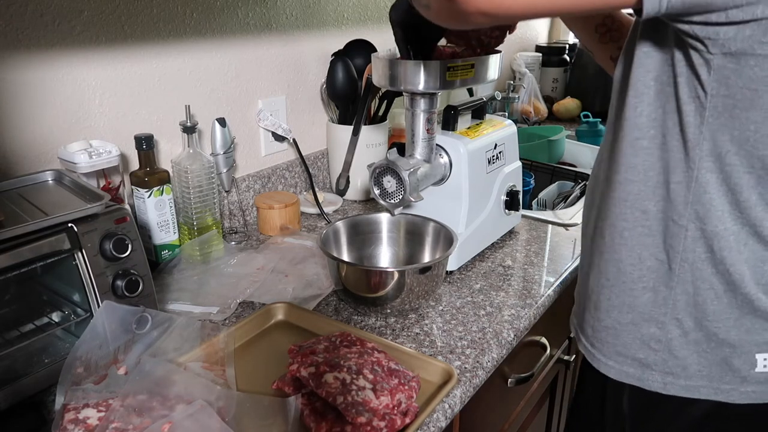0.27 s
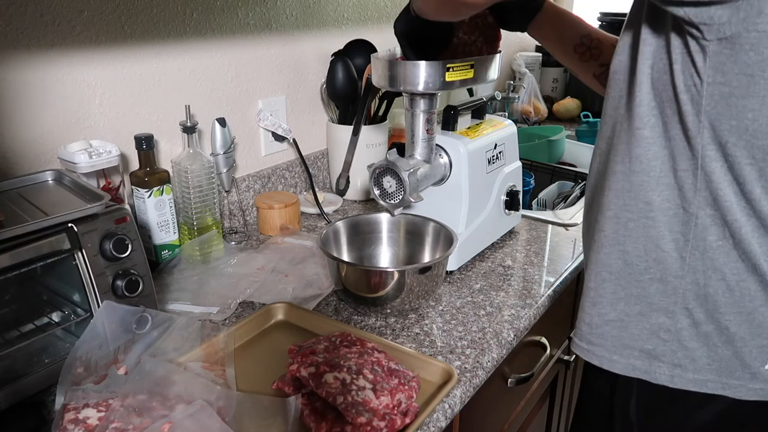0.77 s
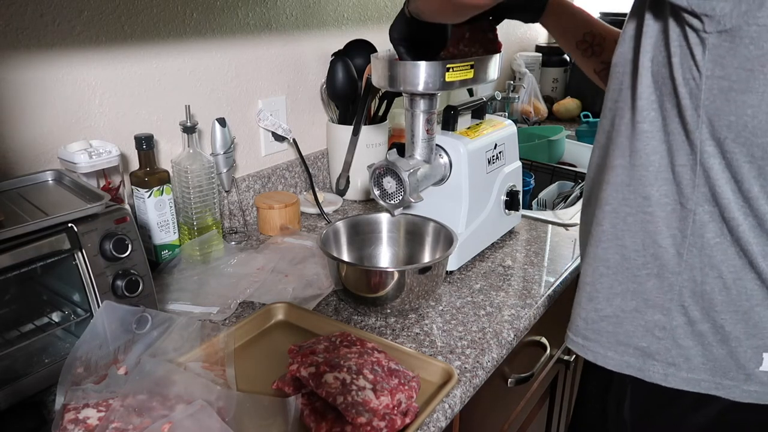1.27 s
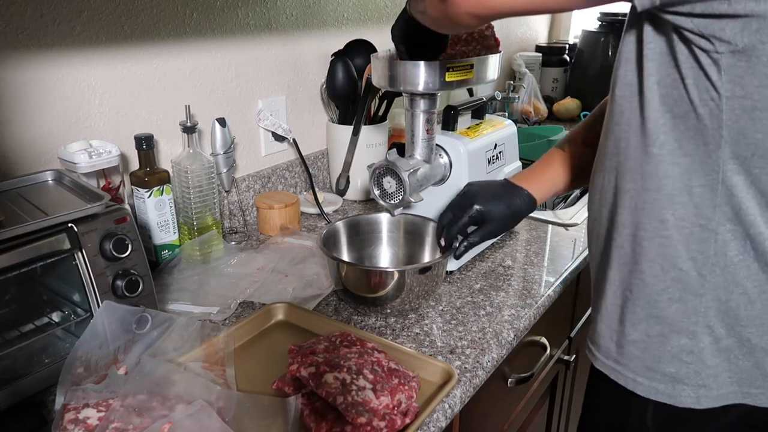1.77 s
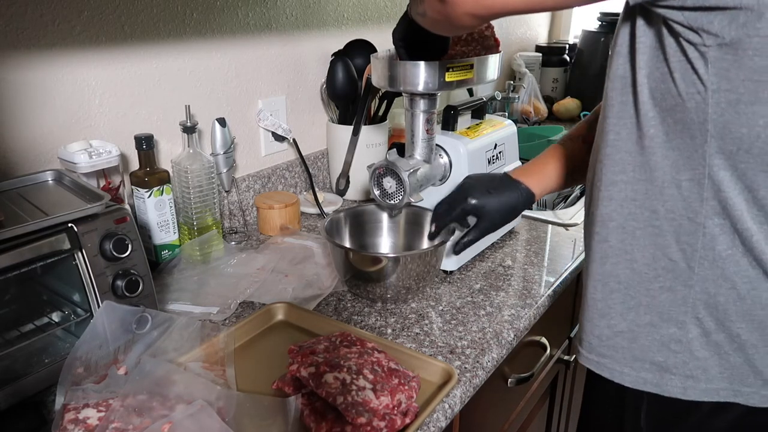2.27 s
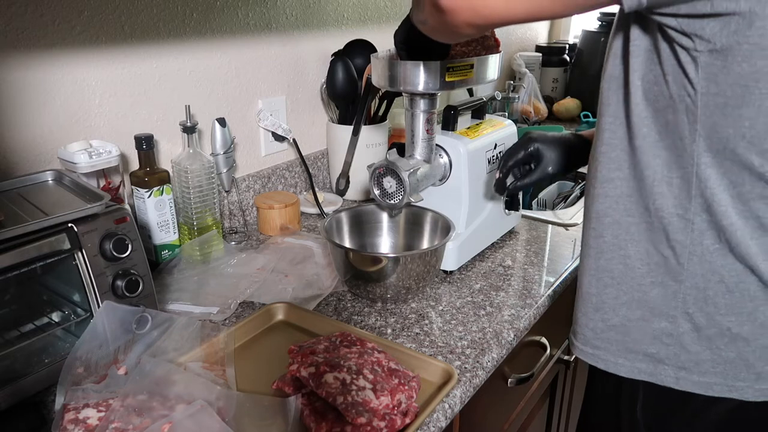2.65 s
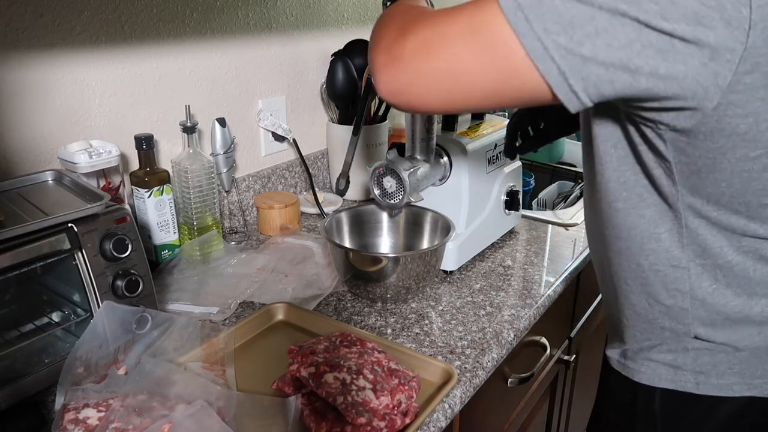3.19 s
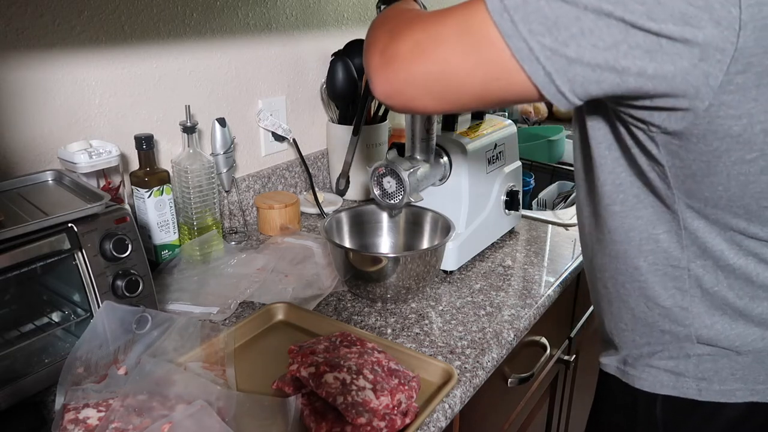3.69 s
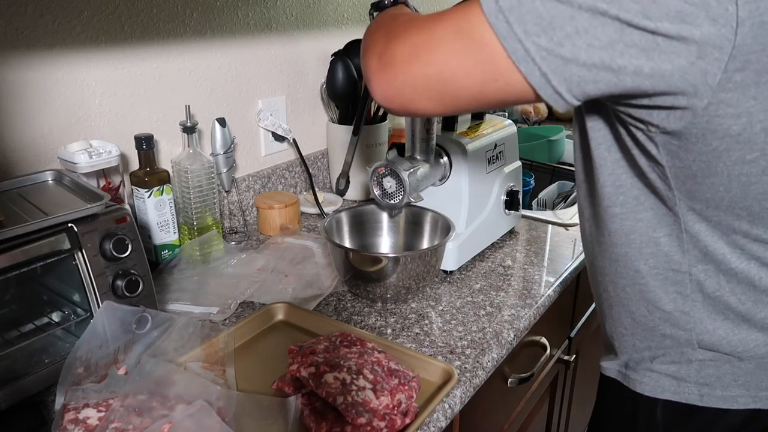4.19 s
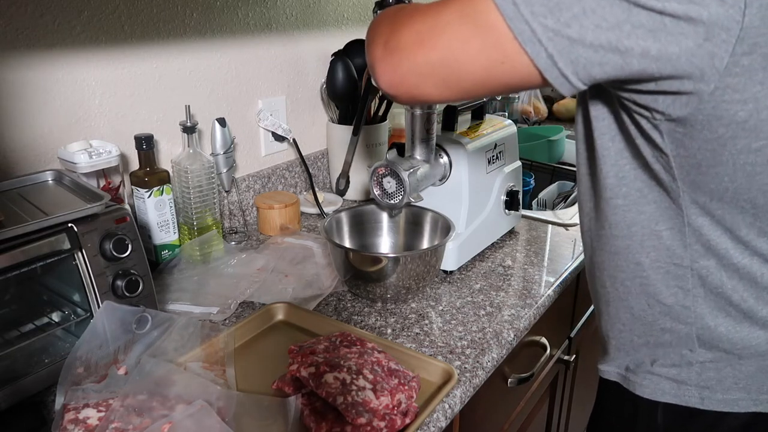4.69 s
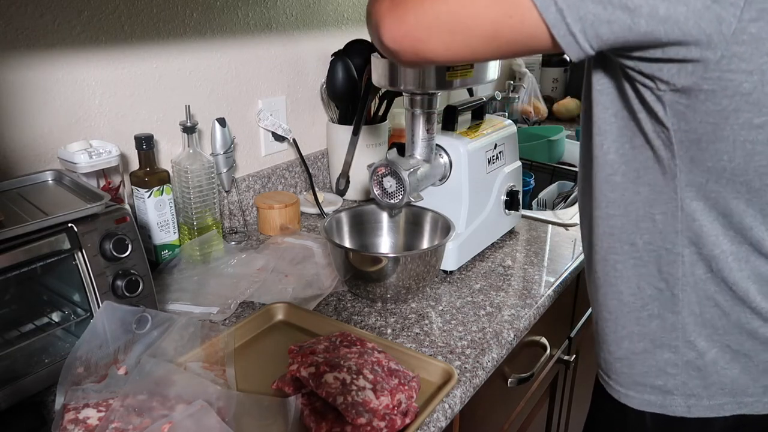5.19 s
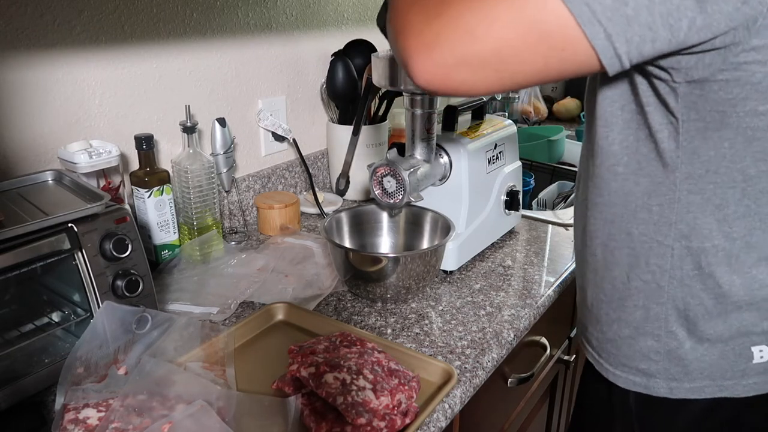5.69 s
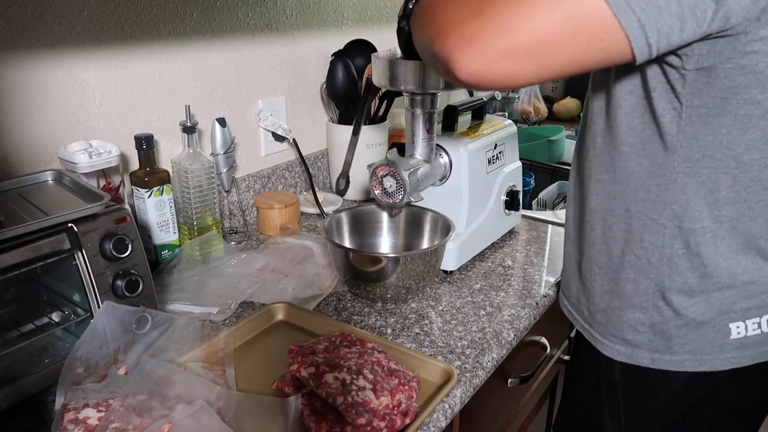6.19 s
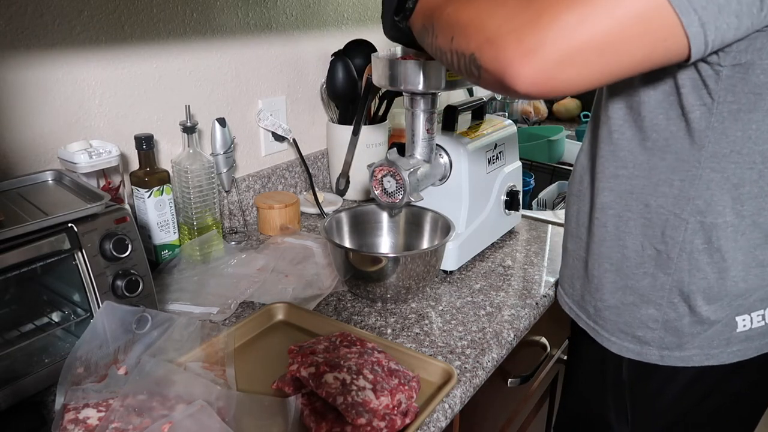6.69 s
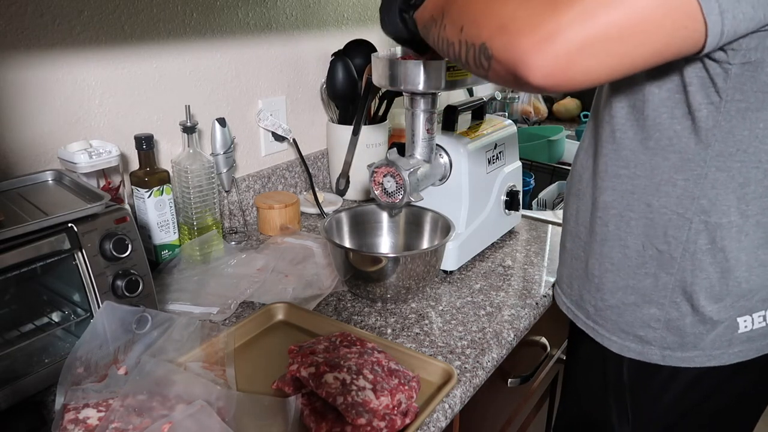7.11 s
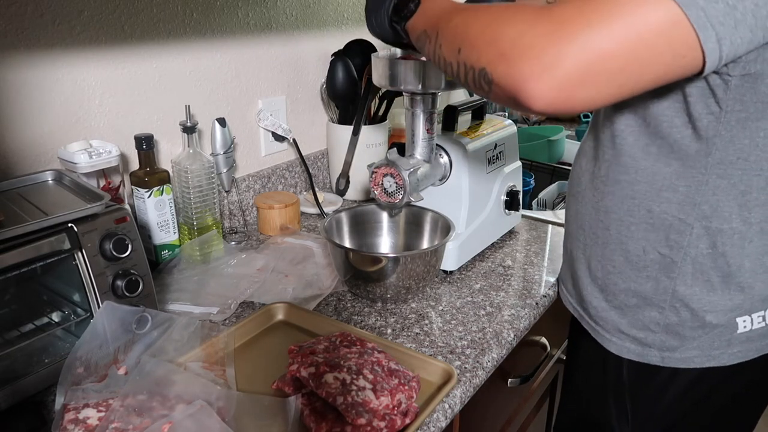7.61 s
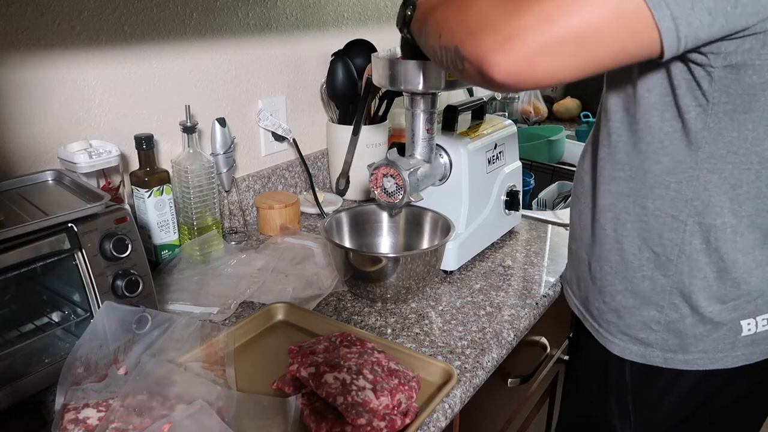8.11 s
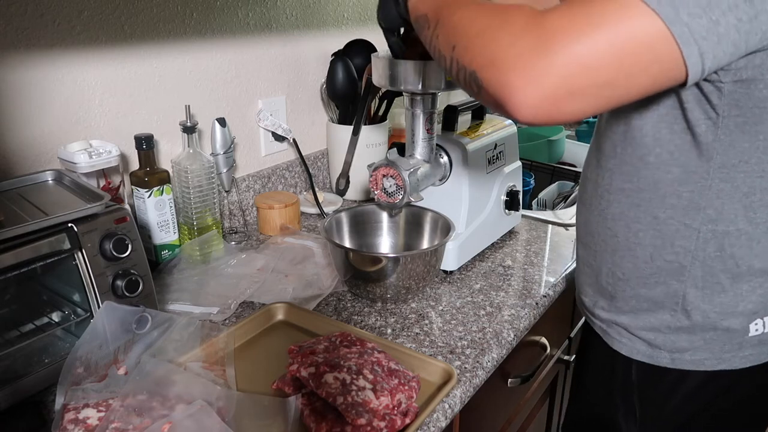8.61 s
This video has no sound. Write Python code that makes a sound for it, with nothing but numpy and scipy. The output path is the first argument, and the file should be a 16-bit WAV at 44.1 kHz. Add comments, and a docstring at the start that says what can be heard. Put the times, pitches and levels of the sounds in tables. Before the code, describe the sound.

A small electric meat grinder runs throughout on a kitchen counter: low motor hum, high unsteady gear whine and dense harsh rattle. About two seconds in, a steel bowl is knocked once with a quick clack and thud. As meat loads the machine, the pitch sags slightly, the rattle softens and the whine sings more clearly. Close, dry stereo pickup with the noise spread wide at the top.

```python
"""A high whine, a hum and a harsh rattle sound from the start: an electric meat grinder on a kitchen counter.
The motor hums once a turn, its pinion whines at the tooth rate against the first gear, later gears drone,
and loose gears rattle as noise that partly repeats with each gear turn, coloured by the housing.
Half-frozen meat loads the auger: speed sags, the teeth stay in contact, and rattle gives way to whine.
A hand knocks the bowl once; it clacks, thuds and settles in a quick run of blows."""
import sys
import numpy as np
from scipy import signal
from scipy.fft import rfft, irfft
from scipy.io import wavfile

SR = 44100
rng = np.random.default_rng(int(sys.argv[2]) if len(sys.argv) > 2 else 0)


def master(y):
    """Save y as 16-bit WAV."""
    cut = np.clip(np.atleast_2d(y).T, -1, 1)
    pcm = np.round(cut * 32767)  # scale
    wavfile.write(sys.argv[1], SR, pcm.astype(np.int16))


N = 390285
T = np.arange(N) / SR
HZ = np.fft.rfftfreq(N, 1 / SR)

# mean motor speed, sagging as the meat is pushed in: (time [s], speed [turns/s])
MEAN_SPEED = [(0.0, 266.1), (0.16, 264.1), (0.67, 267.2), (0.84, 266.5), (1.17, 261.3), (2.24, 261.5),
              (2.5, 259.4), (2.68, 255.6), (3.29, 257.4), (3.51, 253.8), (3.9, 252.4), (4.65, 253.2),
              (5.17, 249.2), (5.5, 251.6), (5.74, 243.8), (6.45, 238.4), (7.28, 243.6), (7.58, 243.1),
              (8.85, 249.3)]
# stereo width over frequency: (frequency [Hz], side relative to middle [dB])
STEREO_WIDTH = [(60, -32), (200, -44), (400, -17.5), (650, -30), (1300, -29), (2300, -26.5), (2800, -27.5),
                (3400, -5.5), (4500, -5), (6500, -2), (9000, 5), (14000, 5.5)]
PINION_TEETH, GEAR_TEETH = 7, 47
# the teeth are pressed tight at the first motor speed and run loose at the second [turns/s]
TIGHT_HZ, LOOSE_HZ = 240, 266


def gain_of(db):
    """Level to amplitude: 20 dB is a factor of ten."""
    return 10 ** (np.asarray(db) / 20)


def evened(x):
    """Normalisation to unit rms, so that a following gain sets the level."""
    return x / np.sqrt(np.mean(abs(x) ** 2) + 1e-20)


def curve(rows):
    """Linear interpolation of a control curve to every sample."""
    return np.interp(T, *np.transpose(rows))


def read(points, hz):
    """Linear interpolation of a spectrum on a logarithmic frequency axis."""
    f, value = np.transpose(points)
    return np.interp(np.log(hz + 1), np.log(f + 1), value)


def bump(middle, length):
    """A flat-topped exponential pulse: it rises to 1, holds and falls, with 1/e at both ends of length."""
    shape = np.zeros(N)
    near = slice(*np.searchsorted(T, [middle - length, middle + length]))
    shape[near] = np.exp(-(2 * (T[near] - middle) / length) ** 4)
    return shape


def wander(hz):
    """Low-passed random fluctuation of rms 1, with changes up to about hz."""
    size = 4096
    f = np.fft.rfftfreq(size, T[-1] / size)
    slow = irfft(rfft(rng.standard_normal(size)) / (1 + (f / hz) ** 2))
    return np.interp(T, np.linspace(0, T[-1], size), evened(slow))


def tooth_pattern(turns, count):
    """Periodicity of gear flaws: a random pattern of count harmonics recurs with every turn."""
    size = 16384
    flaws = irfft(np.r_[0, np.exp(2j * np.pi * rng.random(count))], size)
    return np.interp(turns % 1, np.arange(size) / size, evened(flaws))


def tone(turns, flutter, flutter_hz):
    """Random modulation of a rotating phasor, in strength and phase; its real part has rms near 1."""
    unsteady = 1 + flutter * (wander(flutter_hz) + 1j * wander(flutter_hz))
    return np.sqrt(2) * evened(unsteady) * np.exp(2j * np.pi * (turns + rng.random()))


def stereo(mid, side):
    """Sum and difference: middle and side become left and right."""
    return np.array([mid + side, mid - side])


def spread_tone(turns, flutter, flutter_hz):
    """Quadrature stereo: a side part a quarter cycle off, sized by the width at the mean frequency."""
    mean_hz = turns[-1] / T[-1]
    rotating = tone(turns, flutter, flutter_hz)
    side_gain = rng.choice([-1, 1]) * gain_of(read(STEREO_WIDTH, mean_hz))
    return stereo(rotating.real, rotating.imag * side_gain)


def looseness():
    """Tooth contact under load: 0 when speed sags to the tight value, 1 when the teeth run loose."""
    return np.interp(curve(MEAN_SPEED), [TIGHT_HZ, LOOSE_HZ], [0, 1])


def regularity():
    """Periodic against random gear noise: the share that repeats each turn depends on mean speed."""
    # repeating share, largest at middle speeds: (motor speed [turns/s], share [0-1])
    repeating_share = [(240, 0.28), (254, 0.4), (266, 0.26)]
    return np.clip(np.interp(curve(MEAN_SPEED), *np.transpose(repeating_share)), 0, 1)


def auger_turns():
    """Gear reduction: the auger's turns are the integral of mean motor speed over the ratio."""
    motor_turns_per_auger_turn = 82.03
    return np.cumsum(curve(MEAN_SPEED)) / SR / motor_turns_per_auger_turn


def speed():
    """Cyclic load: the auger meets the meat once a turn and motor speed [turns/s] swings about its sag."""
    swing_hz, fastest_at = 1.35, .037  # swing either way with loose gears; place in the auger turn [0-1]
    swing = swing_hz * (1 + looseness()) / 2  # narrower under load
    return curve(MEAN_SPEED) + swing * np.cos(2 * np.pi * (auger_turns() - fastest_at))


def swell_db(name):
    """Cyclic modulation: a sound's level rises and falls with each auger turn."""
    # swell once an auger turn, by sound: (depth either way [dB], place of the peak in the turn [0-1])
    swells = {"hum": (0.35, 0.38), "teeth": (0.73, 0.59), "whine": (0.26, 0.044), "lower": (2.1, 0.85),
              "rattle": (0.45, 0.2)}
    depth_db, peak_at = swells[name]
    return depth_db * np.cos(2 * np.pi * (auger_turns() - peak_at))


def response(name):
    """Structural resonance: the housing favours each tone at certain speeds; returns amplitude."""
    # the motor speeds of the response levels: (speed [turns/s])
    response_speeds = (238.5, 243, 248.5, 251, 253, 257, 261.5, 264.5, 267)
    # level of each tone, one column per speed above: (level [dB], ...)
    # hum, its third harmonic, tooth tone, the whine at its octave, the whine's lower and upper sidebands
    response_levels = {"hum": (-32.5, -36.5, -38.5, -40.5, -42.5, -38.5, -36, -39.5, -41),
                       "third": (-56.5, -52.5, -48, -48.5, -53, -58, -61, -58, -45),
                       "teeth": (-45.5, -40.5, -46, -43.5, -45, -53, -55, -52, -51),
                       "whine": (-33.5, -34, -37, -32.5, -34.5, -41, -43, -42.5, -43),
                       "lower": (-62, -56.5, -49.5, -43.5, -40.5, -48, -43, -42.5, -57),
                       "upper": (-50, -50.5, -59, -57, -56, -59, -61, -47, -48)}
    return gain_of(np.interp(speed(), response_speeds, response_levels[name]))


def strength_of(name):
    """Resonant response times cyclic swell: a tone's amplitude."""
    return response(name) * gain_of(swell_db(name))


def flared(strength, which):
    """Power summation: brief flares, as the teeth bite and sing out, add to a tone's mean square."""
    # flares: (middle [s], length [s], tone, level [dB])
    flare_events = [(0.07, 0.13, "teeth", -38), (0.303, 0.31, "lower", -47), (0.08, 0.15, "whine", -35),
                    (0.405, 0.16, "teeth", -36), (0.412, 0.092, "whine", -36.5),
                    (0.69, 0.08, "teeth", -34.5), (0.815, 0.19, "whine", -39.5), (.85, 0.19, "lower", -38),
                    (1.007, 0.048, "whine", -38), (1.186, .08, "lower", -48),
                    (1.282, 0.041, "whine", -30.5), (1.5, 0.09, "lower", -38), (1.85, .12, "lower", -48),
                    (1.9, 0.064, "whine", -41), (2.12, 0.11, "lower", -39.5), (2.43, 0.084, "lower", -34.5),
                    (2.584, 0.15, "whine", -36.5), (2.78, 0.057, "lower", -31),
                    (3.004, 0.034, "whine", -35), (3.196, 0.1, "whine", -35), (3.2, .12, "lower", -40),
                    (3.516, 0.022, "whine", -22), (3.605, 0.27, "teeth", -44), (3.62, 0.043, "lower", -37),
                    (3.844, 0.021, "whine", -30.5), (3.954, 0.063, "whine", -34),
                    (4.17, 0.057, "whine", -30.5), (4.29, 0.11, "teeth", -38), (4.33, 0.045, "whine", -36),
                    (4.607, 0.046, "teeth", -41), (4.947, 0.088, "teeth", -36.5),
                    (5.013, 0.075, "whine", -30.5), (5.3, 0.11, "teeth", -39), (5.76, 0.17, "whine", -33),
                    (6.5, 0.095, "whine", -33), (6.643, 0.081, "teeth", -34.5),
                    (6.723, 0.065, "whine", -33.5), (6.98, 0.14, "teeth", -35), (7.146, 0.03, "whine", -29),
                    (7.274, 0.1, "teeth", -34.5), (7.45, 0.065, "whine", -29), (7.622, 0.081, "teeth", -37),
                    (7.744, 0.12, "whine", -27), (7.875, 0.1, "whine", -29.5), (8.005, 0.075, "whine", -29),
                    (8.25, 0.72, "whine", -36), (8.51, .08, "teeth", -41), (8.612, 0.044, "whine", -31),
                    (8.795, 0.39, "teeth", -42.5), (8.802, 0.088, "whine", -41)]
    power = sum(gain_of(db) ** 2 * bump(s, length) for s, length, name, db in flare_events if name == which)
    return np.sqrt(strength ** 2 + power)


def contact():
    """Loss of contact: the gain is near 1 while teeth press together and dips as they slip."""
    # slips: (middle [s], length [s], dip [dB])
    slip_events = [(0.253, 0.11, -16), (0.543, 0.19, -2.5), (1.117, 0.085, -13), (1.53, 0.25, 0),
                   (1.753, .07, -14), (2.212, 0.1, -13), (2.456, 0.14, -11), (3.392, 0.23, -28),
                   (3.595, 0.055, -15), (4.265, 0.06, -11), (4.463, 0.13, -5.5), (5.198, 0.2, -6.5),
                   (5.292, 0.074, -13), (5.932, 0.068, -7), (6.077, 0.09, -12), (6.218, 0.031, -11),
                   (8.066, 0.033, -7), (8.467, 0.089, -10)]
    return gain_of(sum(db * bump(s, length) for s, length, db in slip_events))


def housing_db(hz):
    """Superposed resonances: housing and counter favour or weaken a frequency, in dB."""
    # peaks and dips: (centre [Hz], width at half the dB [Hz], height [dB])
    housing_peaks = [(59.6, 14, 9), (111, 45, 9.5), (209.5, 46.6, 14.5), (301.6, 15.6, 7), (419, 45, 2.3),
                     (647.6, 121, 10), (793, 99, 7.5), (938, 68, 4), (1016, 43, -7.5), (1310, 73, 2.5),
                     (1935, 39, 7.5), (2228, 65, 2.5), (2571, 73, 8), (2740, 120, 5.5), (2865, 77, 6),
                     (3116, 55, 4), (3326, 99, 4.5), (3910, 49, -4), (4310, 41, 4), (4750, 130, 0.5),
                     (4810, 99, 7), (5360, 100, -10.5), (5310, 40, 9.5), (5400, 60, 6), (5500, 90, -3),
                     (6050, 120, -3), (6320, 130, -5.5)]
    return sum(db / (1 + (2 * (hz - peak) / width) ** 4) for peak, width, db in housing_peaks)


def bowl(clack_t60=0.083, rise=0.0041):
    """Impact excitation: each blow is a sharp crack, a short steel clatter and decaying counter modes."""
    # blows of the knock and the settling: (time [s], clack level [dB], thud level [dB])
    knock_blows = [(2.165, -27, -48), (2.172, -42, -34), (2.182, -34, -52), (2.194, -45, -38),
                   (2.204, -38, -57)]
    # modes of bowl and counter: (frequency [Hz], level [dB], 60 dB decay time [s])
    thud_modes = [(88, -8, .14), (138, -2, 0.16), (168, 6.5, 0.13), (206, 7.5, 0.29), (320, -6, 0.12),
                  (526, -9, 0.25)]
    # relative spectrum of the clack: (frequency [Hz], density [dB per Hz])
    clack_colour = [(40, -34), (150, -6), (520, 1.5), (720, -2), (950, -5), (1150, 2), (1280, -1.5),
                    (1410, 5), (1580, -7), (1780, -3), (2200, -8), (4000, -25), (9000, -33), (14500, -55)]
    crack_db = 10  # peak of the crack above the rms of the undecayed clatter
    t = T[:SR // 2]
    colour = gain_of(read(clack_colour, np.fft.rfftfreq(len(t), 1 / SR)))
    # minimum phase puts the crack's energy at its very start
    log_gain = np.log(gain_of(read(clack_colour, abs(np.fft.fftfreq(len(t), 1 / SR)))))
    crack = np.fft.ifft(np.exp(signal.hilbert(log_gain).conj())).real
    crack = crack / abs(crack).max()
    thud = sum(gain_of(db - 60 * t / t60) * np.sin(2 * np.pi * hz * t) for hz, db, t60 in thud_modes)
    thud = thud * (1 - np.exp(-t / rise))
    # the thud carries little below about 85 Hz
    thud = signal.sosfilt(signal.butter(2, 85, "highpass", fs=SR, output="sos"), thud)
    fade = np.minimum(t / 0.00065, 1) * gain_of(-60 * t / clack_t60)
    out = np.zeros(N)
    for s, clack_db, thud_db in knock_blows:
        clatter = evened(irfft(rfft(rng.standard_normal(len(t))) * colour, len(t))) * fade
        clack = gain_of(crack_db) * crack + clatter
        out[round(s * SR):][:len(t)] += gain_of(clack_db) * clack + gain_of(thud_db) * thud
    return out


def chatter(gear_turns, repeat, throb):
    """Periodic plus random excitation: some tooth blows repeat each gear turn, and all throb with it."""
    repeat = np.clip(repeat, 0, 1)
    repeating = np.sqrt(repeat) * tooth_pattern(gear_turns, count=440)
    chance = np.sqrt(1 - repeat) * rng.standard_normal(N)
    return evened((repeating + chance) * (1 + throb * tooth_pattern(gear_turns, count=10)))


def rattle(gear_turns):
    """Source and filter: tooth blows within the gears' play excite the housing, band by band."""
    # mean rattle in the middle range, before band trims: (time [s], level [dB])
    rattle_level = [(0, -36.5), (1.9, -36), (2.4, -38), (3.3, -36), (4.1, -38.5), (5.45, -38),
                    (5.85, -39.5), (6.4, -39.5), (6.85, -42), (7.9, -42.5), (8.84, -37)]
    # relative broad spectrum of the running machine: (frequency [Hz], density [dB per Hz])
    machine_colour = [(30, -28.5), (80, -23.5), (170, -16), (280, -8), (1050, -4.5), (1700, 0.5),
                      (2700, -1.5), (3400, 2), (4000, -0.5), (4600, -9.5), (6000, -12.5), (8300, -23.5),
                      (11500, -31.5), (13400, -35.5), (14400, -62)]
    # short fits of loose-gear clatter: (middle [s], length [s], rise in the rasp band [dB])
    clatter_fits = [(0.35, 0.064, 0.5), (0.696, 0.065, 2), (1.918, 0.079, 1), (2.526, 0.046, 1),
                    (3.425, 0.14, 0.5), (4.646, 0.062, 1), (4.9, 0.11, 1.5)]
    loose_uneven_db = 1.35  # rms unevenness with the gears loose, half of it under load
    colour = gain_of(read(machine_colour, HZ) + housing_db(HZ))
    # the level refers to the rasping middle range
    colour = colour / np.sqrt(np.mean(colour ** 2 * ((HZ > 1900) & (HZ < 3200))))
    mean_db = curve(rattle_level)
    surge_db = swell_db("rattle") * looseness() ** 2
    fits_db = sum(db * bump(s, length) for s, length, db in clatter_fits)
    under = [1 / (1 + (HZ / edge_hz) ** 8) for edge_hz in (1400, 4300, 8000)]
    # rumble, rasp, hiss and fizz: (band, level [dB], share of the regularity, throb)
    layers = [(under[0], mean_db + 0.26 * surge_db + .1, .6, .1),
              (under[1] - under[0], mean_db + 2.0 * surge_db + fits_db - .7, .85, .14),
              (under[2] - under[1], mean_db + 1.0 * surge_db + 0.63 * fits_db + 0.22, .25, .06),
              (1 - under[2], mean_db + .15 * surge_db + 0.16, .1, .06)]
    out = np.zeros((2, N))
    for band, db, share, throb in layers:
        mid, side = (rfft(chatter(gear_turns, share * regularity(), throb)) * colour * band for _ in range(2))
        uneven_db = loose_uneven_db * (1 + looseness()) / 2 * wander(hz=23.0)
        both = stereo(mid, side * gain_of(read(STEREO_WIDTH, HZ)))
        out += gain_of(db + uneven_db) * irfft(both, N)
    return out


def later_gears(gear_turns, streak_db=2.0):
    """Order tracking: multiples of the first gear's speed drone and swell across the housing's peaks."""
    # tones, before the housing's gain:
    # (multiple of gear speed [1], level under light load [dB], level under heavy load [dB])
    gear_tones = [(12.05, -65, -60.5), (17, -67.5, -65), (18.15, -71, -66), (19.04, -63.5, -61),
                  (23.03, -74, -65), (23.94, -58, -71), (25, -63, -73), (33.83, -57, -56), (35.8, -71, -68),
                  (46.6, -60, -49), (48.7, -69.5, -54), (50.6, -57.5, -51), (61.1, -51, -62),
                  (62.6, -65, -56), (68.8, -63.5, -54.5), (68.9, -56, -65), (72.2, -56, -64),
                  (74.7, -55, -60), (75, -54, -59), (77.6, -59, -64), (82, -59, -70), (82.1, -56, -50.5),
                  (84.2, -69, -46), (88.5, -53.5, -52), (92, -69, -53), (94.6, -66, -45.5), (117, -60, -58)]
    gear_hz = np.gradient(gear_turns) * SR
    speeds = np.linspace(gear_hz.min(), gear_hz.max(), 200)
    motor_speeds = speeds * GEAR_TEETH / PINION_TEETH
    load = np.interp(motor_speeds, [TIGHT_HZ, (TIGHT_HZ + LOOSE_HZ) / 2], [1, 0])
    drone = 0
    for k, light_db, heavy_db in gear_tones:
        level = (1 - load) * gain_of(light_db) + load * gain_of(heavy_db)
        strength = np.interp(gear_hz, speeds, level * gain_of(housing_db(k * speeds)))
        streaks = evened(gain_of(streak_db * wander(hz=11)))  # each tone comes and goes on its own
        drone = drone + strength * streaks * spread_tone(k * gear_turns, flutter=0.68, flutter_hz=9.9)
    return evened(regularity()) * drone


def motor(turns, side_db=-37, second_db=-55):
    """Rotating unbalance: a hum once a turn with harmonics; fan and commutator add faint tones."""
    # faint tones: (multiple of motor speed [1], level [dB])
    motor_tones = [(16, -86), (17, -57.5), (24, -67)]
    hum = strength_of("hum") * tone(turns, flutter=0.086, flutter_hz=8.4)
    # the second harmonic grows as the gears run loose
    second = gain_of(second_db) * looseness() ** 2 * tone(2 * turns, flutter=1.0, flutter_hz=10).real
    third = response("third") * tone(3 * turns, flutter=0.37, flutter_hz=4.9).real
    faint = sum(gain_of(db) * tone(k * turns, flutter=.6, flutter_hz=4).real for k, db in motor_tones)
    return stereo(hum.real, gain_of(side_db) * hum.imag) + second + third + faint


def whine(turns, gear_turns, gear_throb=0.053, swirl=0.23):
    """Gear meshing: pinion teeth sing at the tooth rate and its octave; flaws and runout modulate them."""
    # lean of the whine to one side as room reflections shift with its pitch: (time [s], left over right [dB])
    side_lean = [(0, 1), (.95, -3), (1.15, 1), (1.35, -1.5), (1.7, 1), (2.35, -1.5), (3.6, -1.5),
                 (3.8, 1.5), (3.95, -2.5), (4.7, -1.5), (5.35, -2), (5.87, -1), (6.0, 3), (6.1, -5),
                 (6.8, 3.3), (7.45, 1), (8.33, 1), (8.6, -.8)]
    # overtones of the tooth tone: (multiple of the tooth rate [1], level [dB])
    mesh_overtones = [(3, -68), (4, -72), (5, -76)]
    teeth = PINION_TEETH * turns
    mesh = flared(strength_of("teeth"), "teeth") * tone(teeth, flutter=0.3, flutter_hz=29.8)
    # loose teeth flutter, loaded teeth sing cleanly
    flicker = evened(gain_of((.5 + .9 * looseness()) * wander(hz=18)))
    strength = flared(strength_of("whine"), "whine") * contact() * flicker
    octave = strength * tone(2 * teeth, flutter=.12 + .18 * looseness(), flutter_hz=25)
    # running off centre puts a sideband one motor turn to either side of the whine
    lower = tone(2 * teeth - turns, flutter=0.33, flutter_hz=25.2)
    upper = tone(2 * teeth + turns, flutter=0.78, flutter_hz=23)
    runout = flared(strength_of("lower"), "lower") * lower + response("upper") * upper
    shake = 1 + gear_throb * tooth_pattern(gear_turns, count=3)
    # level and phase [rad] shift oppositely at left and right
    sides = np.array([[1], [-1]])
    lean_db = curve(side_lean) * sides / 2
    lead = swirl * wander(hz=11) * sides
    sung = (octave + runout) * gain_of(lean_db) * np.exp(1j * lead)
    sung = sung + mesh * gain_of(.4 * lean_db) * np.exp(.25j * lead)
    # thin overtones drift in and out, clearer under load
    overtones = 0
    for k, db in mesh_overtones:
        drift = evened(gain_of(2.5 * wander(hz=2)) * (1.4 - looseness()))
        overtones = overtones + gain_of(db) * drift * spread_tone(k * teeth, flutter=1.0, flutter_hz=11)
    return (shake * sung).real + overtones


def scene():
    """Kinematic coupling: one motor shaft, trembling slightly in speed, drives all the gears."""
    turns = np.cumsum(speed() * (1 + 0.00109 * wander(12.3))) / SR
    gear_turns = turns * PINION_TEETH / GEAR_TEETH
    return bowl() + rattle(gear_turns) + later_gears(gear_turns) + motor(turns) + whine(turns, gear_turns)


def record(dry):
    """Band limiting: a linear-phase low-pass filter removes what lies above its edge."""
    edge_hz = 15000
    low_pass = signal.firwin(511, edge_hz, window=("kaiser", 9), fs=SR)
    return signal.oaconvolve(dry, low_pass[None], "same")


dry = scene()
out = record(dry)
master(out)
```